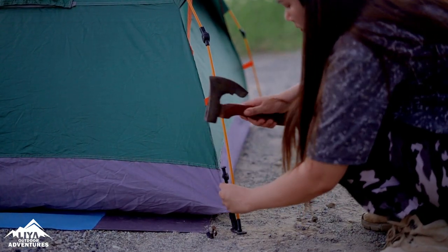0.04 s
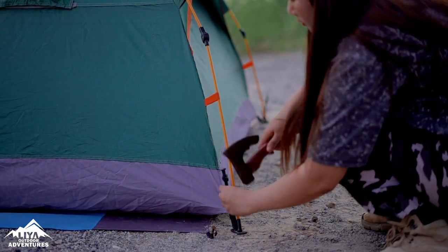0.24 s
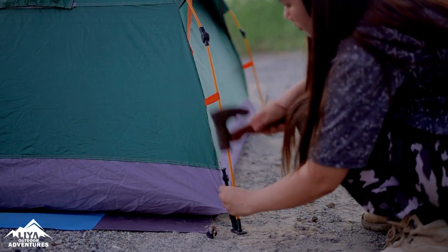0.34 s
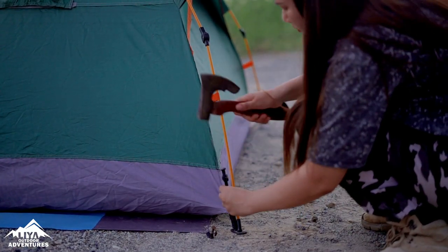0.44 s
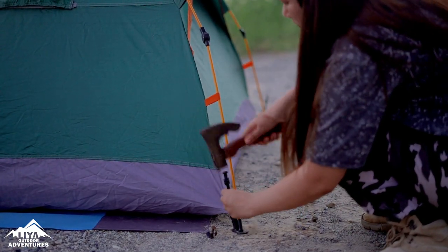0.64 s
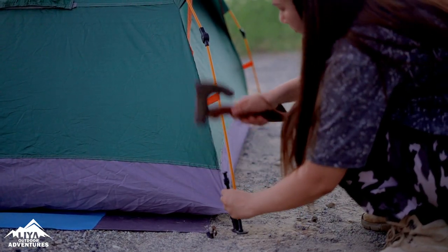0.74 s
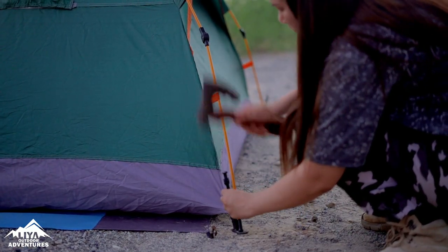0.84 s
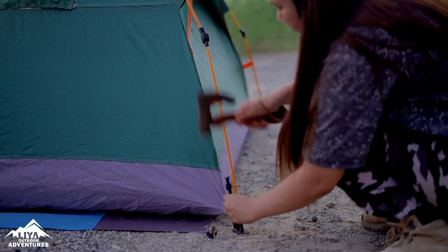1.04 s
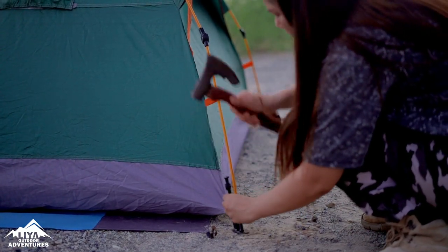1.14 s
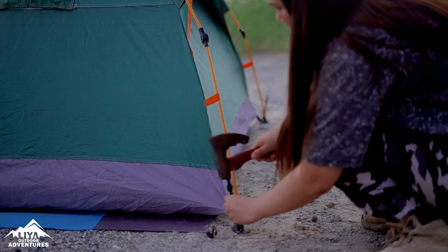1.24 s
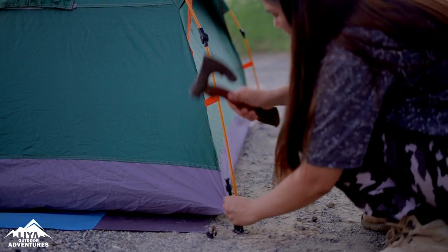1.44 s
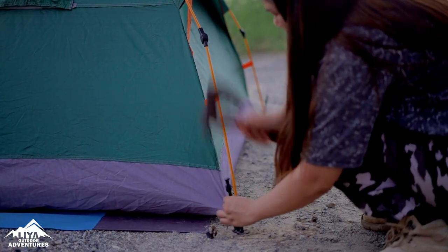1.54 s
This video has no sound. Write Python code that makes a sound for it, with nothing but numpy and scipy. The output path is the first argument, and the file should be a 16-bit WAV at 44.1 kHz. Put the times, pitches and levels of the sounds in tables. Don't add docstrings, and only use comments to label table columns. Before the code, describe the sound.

A hatchet hits a steel stake in gravel four times, at about 0.26, 0.67, 0.99 and 1.33 seconds: very close, hard, bright clanks with short dry thuds, overloading the microphone, then faint head ring and open-air echoes. Far birds chirp early; a nearer bird whistles a gliding warble from 0.4 to 0.9. Low wind bumps near 0.9-1.0, leaf rustle, distant traffic drone and soft hiss lie beneath.

```python
import sys
import numpy as np
from scipy import signal
from scipy.fft import rfft, irfft
from scipy.io import wavfile
from scipy.ndimage import uniform_filter1d

SR = 44100
rng = np.random.default_rng(int(sys.argv[2]) if len(sys.argv) > 2 else 0)


def magnitude_from_level(level_db):
    exponent = np.asarray(level_db, float) / 20
    return 10 ** exponent


def master_out(mix):
    frames = np.transpose(np.atleast_2d(mix))
    ceiling = np.clip(frames, -1, 1)
    pcm = np.round(ceiling * 32767).astype(np.int16)
    wavfile.write(sys.argv[1], SR, pcm)


N = 70560
OVERLOAD = 1.1

# (time [s], force [dB], crack level [dB], thud level [dB])
BLOW_TIMES = [
    (0.2557, 0.5, 0.5, 2),
    (0.6708, 6.5, -4, -2.5),
    (.9913, 3, 9.5, 0),
    (1.3272, 3.5, 2, -2),
]
# (frequency [Hz], level [dB], t60 [s])
STAKE_MODES = [
    [(4960, -3.5, 0.045), (5710, -10, 0.014), (6360, -15.5, 0.0078)],
    [(4968, 1, 0.025), (5710, -10, .03), (6630, 1.5, 0.0032)],
    [(4980, 3.5, 0.019), (5270, -5, 0.036), (5707, -13, 0.037), (6316, -1.5, 0.0078)],
    [(5000, 3.5, 0.019), (5490, -11.5, 0.038), (5820, 0.5, 0.019), (6860, -8, 0.0057)],
]
# (frequency [Hz], level [dB], t60 [s])
THUD_MODES = [
    [(770, -57, 0.01), (1010, -34, 0.063), (1533, -20, 0.026), (2000, -9, 0.0088), (2515, -13.5, 0.022),
     (3250, -21, 0.029), (3890, -9.5, 0.017), (7080, -14, 0.014), (9100, -25, 0.017), (13300, -28, 0.017)],
    [(1050, -37.5, 0.015), (1363, -38, 0.056), (1690, -18, 0.016), (2660, -25, 0.024), (3900, -42, .02),
     (4830, -7.5, .025), (9000, -22, 0.0093), (10600, -36, .012), (11500, -41, 0.024), (15400, -11, 0.016)],
    [(766, -39, 0.0045), (1073, -23.5, 0.015), (1480, -21, 0.019), (2590, -17.5, 0.021), (3630, -15, 0.021),
     (4200, -12, 0.016), (7300, -19, 0.025), (7800, -26, 0.026), (9800, -26, .014), (15100, -18, 0.024),
     (16170, -35, 0.012)],
    [(780, -27.5, 0.019), (1240, -21, .012), (1900, -25.5, 0.011), (2620, -17, 0.017), (3300, -9.5, 0.014),
     (3880, -6.5, 0.016), (7030, -22, 0.022), (8100, -28, 0.025), (9920, -19.5, 0.016),
     (11500, -39.5, 0.0088), (14000, -19, 0.013), (16400, -15, 0.013)],
]
# (head ring level [dB], ring length share [1], echo level [dB], grip time [s])
AFTERMATH = [
    (-34.5, 0.62, -24, 0.064),
    (-43, 1.45, -27.5, 0.012),
    (-36, 1.47, -24, 0.02),
    (-36.5, 1.38, -21.5, 0.012),
]
# (frequency [Hz], level [dB], t60 [s], split [Hz])
HEAD_MODES = [(5050, -2, .33, 7), (8425, 7.5, .2, 11), (13400, -12, .1, 14), (15630, -30, .1, 12),
              (10300, -17, .12, 12)]
# (frequency [Hz], level [dB])
BLOW_ECHO_COLOUR = [(700, 6), (2500, -5), (4600, 0), (5050, 6), (5500, 1.5), (6200, 0), (8000, -18),
                    (10500, -8)]
# (frequency [Hz], t60 [s])
PITCH_DECAY = [(1000, 0.99), (3000, 0.091), (5500, 0.53), (9000, 0.64), (15000, 0.19)]

# (time [s], pitch [Hz], level [dB])
WARBLE_1 = [(0.418, 2367, -40), (0.428, 2666, -41.5), (0.44, 2684, -29), (0.45, 1900, -38.5),
            (0.454, 1696, -58), (0.458, 1860, -33.5), (0.464, 3200, -28), (0.466, 3150, -36)]
WARBLE_2 = [(0.465, 4106, -43), (0.475, 4330, -39), (0.505, 3560, -41), (0.512, 3470, -26.5),
            (0.53, 3425, -28), (0.553, 3520, -30), (0.558, 3840, -32.5), (0.562, 3910, -30),
            (0.586, 3794, -37)]
WARBLE_3 = [(0.635, 1900, -50), (0.644, 1977, -39), (.652, 2955, -34), (0.661, 2995, -22),
            (0.672, 2516, -34.5), (0.686, 2420, -50)]
WARBLE_4 = [(0.71, 2525, -58), (0.723, 2826, -28.5), (0.734, 2887, -23.5), (0.742, 3182, -26.5),
            (0.756, 3130, -23), (0.765, 3578, -29), (0.779, 3155, -21.5), (0.801, 3165, -24.5),
            (0.82, 3070, -47)]
WARBLE_5 = [(0.822, 3203, -35), (0.831, 3448, -33), (0.852, 3604, -30.5), (0.869, 4044, -35.5),
            (0.885, 3862, -31), (0.888, 3944, -42), (0.897, 3405, -20), (0.903, 3403, -28.5),
            (0.914, 3330, -21)]
WARBLE_6 = [(.9135, 3250, -33), (.9155, 2900, -33), (.9175, 2550, -36), (.922, 2400, -46)]
# (frequency [Hz], t60 [s])
NEAR_TREE_DECAY = [(2000, 0.4), (5000, 0.41)]
# (time [s], length [s], start pitch [Hz], end pitch [Hz], level [dB])
FAR_CHIRPS = [(0, 0.031, 4300, 2570, -46.5), (0.076, 0.022, 3455, 3380, -47),
              (0.134, 0.022, 2274, 2136, -45), (0.153, 0.011, 4630, 4420, -49),
              (0.153, 0.026, 2630, 3460, -37), (0.196, 0.044, 3360, 3300, -43.5),
              (0.195, 0.038, 2590, 2360, -46), (0.183, 0.022, 3520, 2580, -36.5),
              (0.189, 0.0305, 4480, 4920, -47.5), (0.262, 0.027, 3250, 3370, -36.5),
              (0.308, 0.025, 3600, 4210, -35), (0.326, 0.012, 3872, 4908, -30),
              (0.331, 0.015, 5124, 3860, -30), (0.339, 0.013, 3850, 4670, -41),
              (0.361, 0.027, 4200, 3580, -40), (0.306, 0.033, 1976, 2734, -38.5),
              (0.371, 0.013, 6070, 7350, -47), (0.41, 0.033, 3800, 5670, -43.5),
              (0.496, 0.009, 4640, 4230, -39), (0.557, 0.017, 4680, 4300, -45),
              (.578, 0.02, 4830, 4280, -49), (0.642, 0.0059, 3760, 4500, -33),
              (0.485, .022, 5560, 6820, -50), (0.594, 0.018, 6200, 6800, -51),
              (.466, .012, 6280, 6660, -55), (1.213, 0.018, 2710, 4830, -40),
              (1.231, 0.033, 4700, 4050, -46), (1.257, 0.062, 4800, 4100, -45)]
# (frequency [Hz], t60 [s])
FAR_TREE_DECAY = [(2000, .1), (5000, .085)]

# (time [s], length [s], level [dB])
WIND_PUFFS = [
    (.865, 0.036, -33.5),
    (0.98, 0.043, -36),
    (0.926, 0.16, -42),
    (1.02, 0.056, -42),
    (1.3, 0.017, -38),
    (0.45, 0.15, -41),
    (0.28, 0.085, -50),
]
# (time [s], level [dB], width [s])
WIND_BUFFETS = [
    (0.867, -27, .004),
    (0.8852, -21, 0.0018),
    (0.941, -37, 0.0017),
    (0.981, -31, 0.0015),
    (1.003, -19, 0.0074),
    (1.021, -41, 0.0041),
    (1.037, -26.5, 0.0025),
]
# (time [s], pitch [Hz], level [dB])
ENGINE_NOTE = [(0.0, 63.04, -32), (0.346, 64.58, -30.5), (0.538, 66, -35), (0.57, 66.2, -25),
               (0.632, 64, -34), (0.756, 59.1, -28.5), (0.802, 56.4, -44), (0.876, 56, -30.5),
               (0.894, 57.1, -48), (0.998, 57.2, -31), (1.064, 67.16, -31.5), (1.172, 67, -37.5),
               (1.568, 66.35, -36), (1.6, 64.4, -41)]
# (frequency [Hz], level [dB per Hz])
RUMBLE_SPECTRUM = [(15, -11), (32, 3), (46, 8), (65, 4.5), (85, 8), (120, -7.5), (170, -9.5), (260, -72)]
# (frequency [Hz], level [dB per Hz])
HISS_SPECTRUM = [(90, -2.5), (140, -0.5), (350, -8.5), (700, -15), (1500, -18.5), (4000, -17.5),
                 (8000, -40), (15700, -31)]


def evened(x):
    return x / np.sqrt(np.mean(x ** 2) + 1e-20)


def read(points, hz):
    f, value = np.transpose(points)
    return np.interp(np.log(hz + 1), np.log(f + 1), value, -90, value[-1])


def add(mix, s, sound):
    part = mix[round(max(s, 0) * SR):][:len(sound)]
    part += sound[:len(part)]


def band(x, kind, hz, order=2):
    return signal.sosfilt(signal.butter(order, hz, kind, fs=SR, output="sos"), x)


def smooth(x, size, axis=-1):
    return uniform_filter1d(uniform_filter1d(x, size=size, axis=axis), size=size, axis=axis)


def shaped(spectrum, patchy_db):
    hz = np.fft.rfftfreq(2048, 1 / SR)
    a, b, patches = rng.standard_normal((N // 512 + 5, 1025, 3)).T
    patches = uniform_filter1d(patches, size=24, axis=0)
    patches = evened(uniform_filter1d(patches, size=6, axis=1))
    level_db = read(spectrum, hz)[:, None] + patchy_db * patches
    noise = signal.istft((a + 1j * b) * magnitude_from_level(level_db), nperseg=2048, noverlap=1536)[1]
    return evened(noise[:N])


def field(x, decays, slap_db):
    slap_s, slap_spread_s = 0.201, 0.0082
    first_echo_s = 0.0085
    taps = np.zeros(SR // 2)
    at = np.arange(0, len(taps) - 24, 24)
    at = at + rng.integers(0, 24, len(at))
    taps[at] = rng.choice([-1., 1.], len(at))
    hz, t, z = signal.stft(taps, SR, nperseg=256)
    t60 = np.interp(hz, *np.transpose(decays))[:, None]
    slap = magnitude_from_level(slap_db) * np.exp(-((t - slap_s) / slap_spread_s) ** 2)
    tail = signal.istft(z * (magnitude_from_level(-60 * t / t60) + slap), SR, nperseg=256)[1]
    tail *= np.clip(np.arange(len(tail)) / SR / first_echo_s - .5, 0, 1)
    return signal.fftconvolve(x, tail / np.linalg.norm(tail))[:N]


def limited(x):
    envelope = uniform_filter1d(abs(signal.hilbert(x)), size=9)
    return x / np.maximum(envelope / OVERLOAD, 1)


def modes(table, t, glide=0):
    glide_s = 0.000456
    bent = t + glide * glide_s * (1 - np.exp(-t / glide_s))
    return sum(magnitude_from_level(db - 60 * t / t60) * np.sin(2 * np.pi * hz * bent) for hz, db, t60 in table)


def steel_crack(t, level_db):
    rise_s, t60 = .00025, 0.0033
    burst = band(rng.standard_normal(len(t)), "band", (1200, 13000))
    return burst * np.minimum(t / rise_s, 1) * magnitude_from_level(level_db - 60 * t / t60)


def head_ring(t, ring_db, share):
    ring = np.zeros(len(t))
    for hz, db, t60, split in HEAD_MODES:
        t60 = t60 * share
        ring += modes([(hz, db, t60)], t) - .8 * modes([(hz + split / share, db, t60)], t)
    return magnitude_from_level(ring_db) * ring


def blows():
    near, sent = np.zeros(N), np.zeros(N)
    t = np.arange(SR // 3) / SR
    for blow, after, stake, thud in zip(BLOW_TIMES, AFTERMATH, STAKE_MODES, THUD_MODES):
        s, force_db, crack_db, thud_db = blow
        ring_db, share, echo_db, grip_s = after
        steel = modes(stake, t, glide=0.453) * np.exp(-(t / grip_s) ** 2)
        ground = magnitude_from_level(thud_db) * modes(thud, t)
        hit = -magnitude_from_level(force_db) * (steel_crack(t, crack_db) + steel + ground)
        add(near, s, hit)
        add(near, s, head_ring(t, ring_db, share))
        add(sent, s, magnitude_from_level(echo_db) * hit)
    colour = magnitude_from_level(read(BLOW_ECHO_COLOUR, np.fft.rfftfreq(N, 1 / SR) + 700))
    sent = band(irfft(rfft(sent) * colour, N), "low", 11500, order=12)
    near = limited(near)
    lead, lead_db = 768, -13.4
    near = near + magnitude_from_level(lead_db) * np.pad(near, (0, lead))[lead:]
    return near, field(sent, PITCH_DECAY, slap_db=-15.5)


def whistle(t, hz, db, wobble):
    flutter_db, end_s = 2.5, 0.00023
    slow = smooth(rng.standard_normal((2, 9000)), 120)
    flutter, waver = evened(slow)[:, :len(t)]
    ends = np.clip(np.minimum(t - t[0], t[-1] - t) / end_s, 0, 1)
    hz = uniform_filter1d(hz, size=100) * (1 + wobble * waver)
    level = np.sqrt(2) * ends * magnitude_from_level(db + flutter_db * flutter)
    return level * np.sin(2 * np.pi * np.cumsum(hz) / SR)


def near_bird():
    out = np.zeros(N)
    for note in (WARBLE_1, WARBLE_2, WARBLE_3, WARBLE_4, WARBLE_5, WARBLE_6):
        s, hz, db = np.transpose(note)
        t = np.arange(s[0], s[-1], 1 / SR)
        add(out, s[0], whistle(t, np.interp(t, s, hz), np.interp(t, s, db), wobble=.006))
    return out + magnitude_from_level(-6) * field(out, NEAR_TREE_DECAY, slap_db=-90)


def far_birds():
    out = np.zeros(N)
    for s, length, from_hz, to_hz, db in FAR_CHIRPS:
        t = np.arange(0, length, 1 / SR)
        swell = np.sin(np.pi * t / length)
        hz = from_hz + (to_hz - from_hz) * t / length
        add(out, s, swell * whistle(t, hz, db, wobble=.03))
    rasp = evened(smooth(rng.standard_normal(N), 36))
    out = out * (0.88 + .7 * rasp)
    return magnitude_from_level(-1.5) * out + magnitude_from_level(-1.5) * field(out, FAR_TREE_DECAY, slap_db=-85.5)


def wind():
    t = np.arange(N) / SR
    gust = sum(magnitude_from_level(db) * np.exp(-((t - s) / length * 2) ** 2) for s, length, db in WIND_PUFFS)
    puffs = gust * evened(band(rng.standard_normal(N), "band", (114, 360)))
    push = np.zeros(N)
    for s, db, width in WIND_BUFFETS:
        u = (t - s) / width
        push += magnitude_from_level(db) * (1 - u ** 2) * np.exp(-u ** 2 / 2)
    rustle_s, rustle_length_s, rustle_db = .5, 1.5, -52
    swell = magnitude_from_level(rustle_db) * np.exp(-((t - rustle_s) / rustle_length_s * 2) ** 2)
    rustle = swell * evened(band(rng.standard_normal(N), "band", (4800, 7600)))
    return puffs + push + rustle


def drone():
    s, hz, db = np.transpose(ENGINE_NOTE)
    t = np.arange(N) / SR
    a, b = band(rng.standard_normal((2, N)), "low", 6, order=1)
    waver = 1 + .15 * (evened(a) + 1j * evened(b))
    turning = np.exp(2j * np.pi * np.cumsum(np.interp(t, s, hz)) / SR)
    engine = magnitude_from_level(np.interp(t, s, db)) * evened((waver * turning).real)
    return magnitude_from_level(-34.5) * shaped(RUMBLE_SPECTRUM, patchy_db=1) + engine


def air_hiss():
    spectrum = rfft(shaped(HISS_SPECTRUM, patchy_db=2.0))
    spectrum = spectrum * (np.fft.rfftfreq(N, 1 / SR) < 15750)
    return magnitude_from_level(-41) * irfft(spectrum, N)


def tick():
    s, level_db, t60 = .1815, -30, .008
    out, t = np.zeros(N), np.arange(2000) / SR
    click = band(rng.standard_normal(len(t)), "high", 3500)
    add(out, s, click * magnitude_from_level(level_db - 60 * t / t60))
    return out


def scene():
    hits, echoes = blows()
    birds = near_bird() + far_birds()
    low = band(wind() + drone(), "high", 46, order=3)
    mid = hits + echoes + birds + low + air_hiss()
    side_rumble = magnitude_from_level(-51.5) * evened(band(rng.standard_normal(N), "low", 56.5))
    side = side_rumble + magnitude_from_level(-33.5) * hits
    return np.array([mid + side, mid - side])


def roll_off(x):
    return signal.sosfilt(signal.butter(12, 16710, fs=SR, output="sos"), x)


def record(dry):
    hot = np.clip(dry + tick(), -OVERLOAD, OVERLOAD)
    hot = signal.oaconvolve(hot, signal.firwin(255, 15950, fs=SR)[None], "same")
    return roll_off(np.clip(hot, -1, 1))


dry = scene()
out = record(dry)
master_out(out)
```